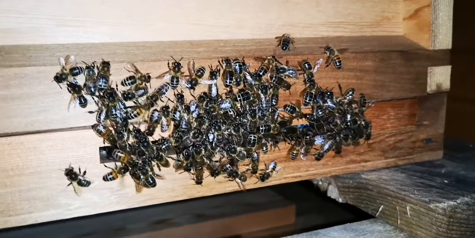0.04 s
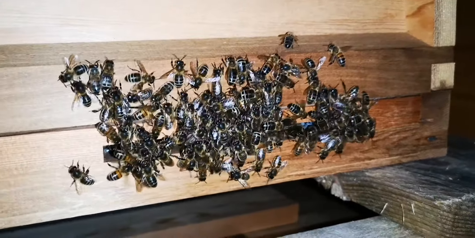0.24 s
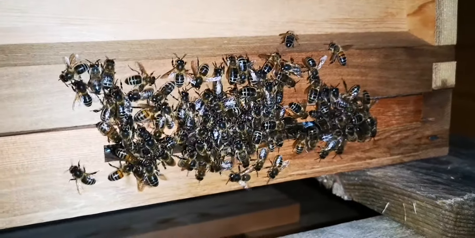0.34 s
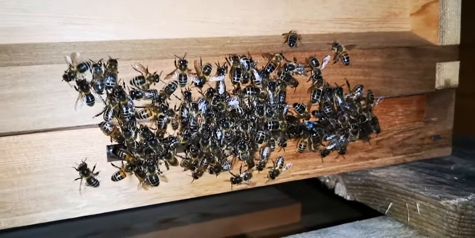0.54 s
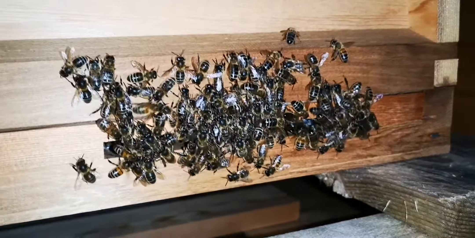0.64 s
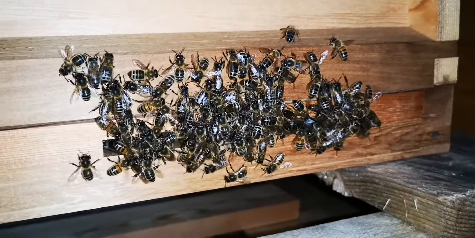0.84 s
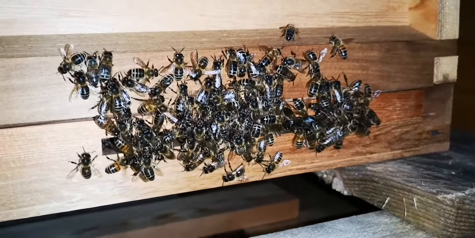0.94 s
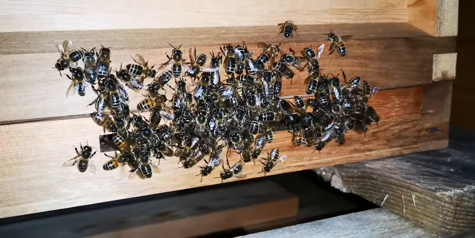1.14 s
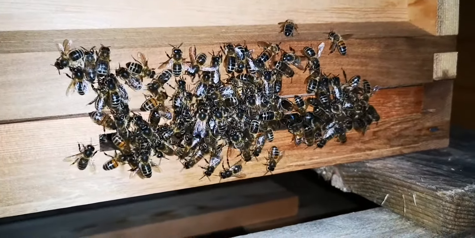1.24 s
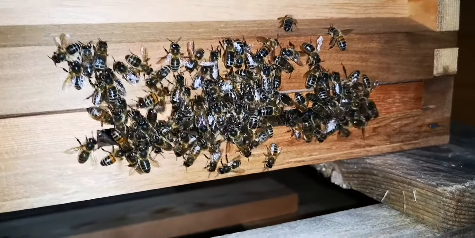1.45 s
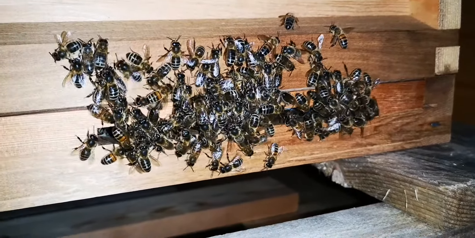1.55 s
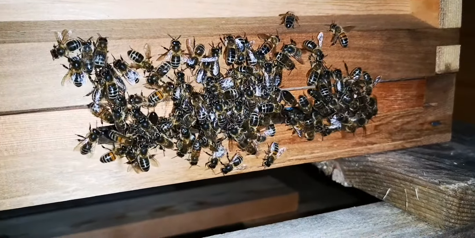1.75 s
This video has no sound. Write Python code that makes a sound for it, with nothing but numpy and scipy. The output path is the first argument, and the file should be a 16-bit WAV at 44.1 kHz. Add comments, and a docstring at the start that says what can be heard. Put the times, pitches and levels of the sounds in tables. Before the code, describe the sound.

A cluster of honey bees hums faintly throughout, slightly to the right, over a soft crawling rustle, steady hiss and low handling rumble. At about 0.25 seconds the hand-held microphone gives a dull thump and a brief rub. Single bees buzz harder around 0.35, 0.6, 1.35 and 1.6 seconds, with tiny scuffs and a barely audible thin whine near 0.5. A small, low knock comes at 1.6 seconds.

```python
"""At the wall of a wooden hive at night, a cluster of honey bees hums faintly, a little right of a
hand-held camera. Many wings beat at nearly the same pitch; single bees fan harder or scuff, and a thin
whine comes and goes over the soft rustle of crawling bodies and steady microphone hiss.
The hand rumbles and bumps on the camera, shifts its grip once with a dull thump and a rub,
and later gives a small knock."""
import sys
import numpy as np
from scipy.fft import rfft, irfft, next_fast_len
from scipy.io import wavfile
from scipy.ndimage import map_coordinates

SR = 44100
rng = np.random.default_rng(int(sys.argv[2]) if len(sys.argv) > 2 else 0)


def unload_audio(sound):
    """Save the sound as a 16-bit wav file, at the path given as the first command line argument."""
    columns = np.transpose(np.atleast_2d(sound))
    # keep every value between -1 and 1, then stretch to whole-number steps
    steps = np.round(np.clip(columns, -1, 1) * 32767)
    wavfile.write(sys.argv[1], SR, steps.astype(np.int16))


N = 79380
TIME = np.arange(N) / SR


def amp(db):
    """Decibels to gain."""
    return 10 ** (np.asarray(db) / 20)


def unit(x):
    """Scale to rms 1."""
    return x / np.sqrt(np.mean(x ** 2) + 1e-20)


def along(points, hz):
    """Read (frequency [Hz], value) points on a log axis."""
    freqs, values = np.transpose(points)
    return np.interp(np.log(hz + 1), np.log(freqs + 1), values)


def fader(points):
    """Ride through (time [s], value) points, one value per sample."""
    return np.interp(TIME, *np.transpose(points))


def wobble(per_s):
    """Smooth random modulation, per_s knots a second."""
    return map_coordinates(rng.standard_normal(1024), [TIME * per_s + 2], mode="wrap")


def swell(middle_s, half_s):
    """A bell-shaped fade in and out."""
    return np.exp(-((TIME - middle_s) / half_s) ** 2)


def filtered(x, response):
    """Filter x by a complex response of frequency."""
    size = next_fast_len(N + SR // 2)
    return irfft(rfft(x, size) * response(np.fft.rfftfreq(size, 1 / SR)), size)[..., :N]


def noise(eq):
    """Noise coloured by an EQ curve, at rms 1."""
    size = next_fast_len(N + SR // 4)
    gain = amp(along(eq, np.fft.rfftfreq(size, 1 / SR)))
    return unit(irfft(rfft(rng.standard_normal(size)) * gain, size)[:N])


# Timbre of a wingbeat (frequency [Hz], relative level [dB])
WING_TIMBRE = [(130, -3), (175, -5.5), (255, -8), (320, -12), (390, -19), (480, -18), (620, -17.5),
               (950, -27.5), (1600, -31.5), (2400, -30)]
def wings(hz, dark_db_per_octave=0, wander=.02, jitter=.06):
    """Beating wings buzz in 15 harmonics; the pitch drifts and jitters, the level flutters."""
    pitch = hz * (1 + wander * wobble(per_s=7) + jitter * wobble(per_s=80))
    phase = 2 * np.pi * np.cumsum(pitch) / SR
    buzz = 0
    for k in range(1, 16):
        db = along(WING_TIMBRE, k * hz) - dark_db_per_octave * np.log2(k)
        buzz += amp(db) * np.sin(k * phase + 2 * np.pi * rng.random())
    flutter_db = 2 * wobble(per_s=77)
    return unit(buzz * amp(flutter_db))


# Groups of humming bees (wingbeat [Hz], relative level [dB])
BEE_GROUPS = [(122, -4.5), (131, -4), (141, -6.5), (160, -5.5)]
# Fader ride of the hum (time [s], level [dB])
HUM_RIDE = [(0, -69.5), (.33, -67.5), (.5, -70.5), (.62, -69), (.75, -71), (.9, -66), (1.15, -70),
            (1.42, -65), (1.5, -68.5), (1.66, -65.5), (1.8, -69.5)]
def hum(swell_db=2):
    """The bed of many beating wings: each group swells and fades by itself."""
    chorus = 0
    for hz, db in BEE_GROUPS:
        group = wings(hz) * amp(swell_db * wobble(per_s=8.99))
        chorus += amp(db) * unit(group)
    return amp(fader(HUM_RIDE)) * unit(chorus)


# Colour of the rustle (frequency [Hz], relative level [dB])
RUSTLE_EQ = [(60, -47), (200, 6), (300, 10), (450, 8.5), (750, -1.5), (980, 3), (1220, -7.5), (1520, -1.5),
             (2100, -8), (4000, -14), (7500, -16.5), (10000, -70)]
def rustle():
    """Crawling bodies blend into a soft, steady noise."""
    return amp(-74) * noise(RUSTLE_EQ)


# Colour of the hand's rumble (frequency [Hz], relative level [dB])
RUMBLE_EQ = [(5, -1), (12, -2.5), (25, -1.5), (42, -10.5), (75, -11.5), (110, -20), (200, -32), (500, -66)]
# Fader ride of the rumble (time [s], level [dB])
RUMBLE_RIDE = [(0, -50.5), (.1, -57.5), (.17, -51), (.22, -55.5), (.33, -49), (.38, -63), (.55, -55),
               (.8, -57.5), (1.2, -59.5), (1.42, -58.5), (1.55, -57.5), (1.65, -56.5), (1.8, -59.5)]
def hand_rumble(width_db=-14):
    """The hand rumbles through the camera body, nearly alike in both microphones."""
    width = amp(width_db) * np.array([noise(RUMBLE_EQ), noise(RUMBLE_EQ)])
    return amp(fader(RUMBLE_RIDE)) * (noise(RUMBLE_EQ) + width)


# Colour of each microphone's hiss (frequency [Hz], relative level [dB])
HISS_LEFT_EQ = [(50, 9), (500, -6), (1200, 0.5), (1800, 5), (2600, 3), (3300, -2), (4200, -3.5), (5000, -4),
                (7900, -9), (8400, -9), (10500, -12.5), (15500, -10.5)]
HISS_RIGHT_EQ = [(50, 14), (500, 3), (1250, 1), (1800, 7.5), (2900, 1), (3900, -1.5), (4700, -5.5),
                 (5200, 0.5), (6400, -1.5), (7100, 2), (7900, 2), (8300, -6), (10200, -10.5),
                 (15500, -14.5)]
# Slow drift of the hiss (time [s], boost [dB])
HISS_RIDE = [(0, 1), (.2, 2), (.45, 2.5), (.72, 1.7), (.9, 1.2), (1.4, 1), (1.63, 1.8), (1.8, 1)]
def microphone_hiss(waver_db=.52):
    """Each microphone has its own slightly wavering hiss, louder on the right."""
    gain = amp(fader(HISS_RIDE) + waver_db * wobble(per_s=16))
    left = amp(-76.5) * noise(HISS_LEFT_EQ)
    right = amp(-72) * noise(HISS_RIGHT_EQ)
    return gain * np.array([left, right])


def push(deepest_s, hz):
    """One soft swing of the camera body: a dip between two shallow crests."""
    spread = (np.pi * hz * (TIME - deepest_s)) ** 2
    return (2 * spread - 1) * np.exp(-spread)


# Bumps on the camera (time [s], peak level [dB], swing [Hz])
CAMERA_BUMPS = [(0.103, -42, 20.4), (0.278, -29, 20.3), (0.363, -48.5, 37), (0.459, -44, 13),
                (0.898, -56, 66), (1.01, -47.5, 14.7), (1.279, -48.5, 21.3), (1.388, -47.5, 17.6),
                (1.478, -48, 26), (1.629, -45, 97)]
def bumps():
    """The hand nudges the camera; the last, quickest push is a small knock."""
    return sum(amp(db) * push(at_s, hz) for at_s, db, hz in CAMERA_BUMPS)


# Accents in the hum (middle [s], half length [s], wingbeat [Hz], level [dB])
FANNING_SURGES = [(0.13, 0.069, 141, -68), (0.353, 0.023, 138, -61.5), (0.599, 0.039, 139, -61.5),
                  (0.648, 0.029, 131.3, -58), (0.828, 0.02, 130, -65.5), (1.079, .04, 136, -67.5),
                  (1.217, 0.046, 143, -65), (1.355, 0.017, 130, -60.5), (1.621, 0.064, 120, -60.5)]
def fanning():
    """Single bees fan harder for a moment, darker in tone than the hum."""
    return sum(amp(db) * swell(middle_s, half_s) * wings(hz, dark_db_per_octave=9.5)
               for middle_s, half_s, hz, db in FANNING_SURGES)


def grip_thump(start_s=.213, attack_s=.01036):
    """The grip slips abruptly and gives the camera one deep, dull swing."""
    slip = np.clip((TIME - start_s) / attack_s, 0, 1)
    fade_in = np.sin(np.pi / 2 * slip) ** 2
    return amp(-21) * fade_in * push(deepest_s=.271, hz=8.77)


def friction(eq, grain_db):
    """Skin sticks and slips: grainy noise, separate in each microphone."""
    return np.array([unit(noise(eq) * amp(grain_db * wobble(per_s=400))) for mic in range(2)])


# Colour of the rub (frequency [Hz], relative level [dB])
RUB_EQ = [(60, 8), (150, 26.5), (290, 23.5), (550, 5.5), (1500, 1), (2800, 2), (4500, -4), (8000, -1),
          (11000, -13), (15500, -12)]
def finger_rub(start_s=.232, length_s=.12, attack_s=.0079, release_s=.045):
    """A finger slides briefly on the case as the grip shifts."""
    attack = np.clip((TIME - start_s) / attack_s, 0, 1)
    release = np.exp(-np.maximum(TIME - start_s - length_s, 0) / release_s)
    return amp(-65.5) * attack * release * friction(RUB_EQ, grain_db=2)


# Colour of the scratch (frequency [Hz], relative level [dB])
SCRATCH_EQ = [(2000, -29), (7000, 9), (12000, -3), (15500, -8)]
def skin_scratch(start_s=.258, decay_s=.0073):
    """The sliding skin catches once with a short, bright scratch."""
    envelope = (TIME > start_s) * np.exp(-np.abs(TIME - start_s) / decay_s)
    return amp(-70) * envelope * friction(SCRATCH_EQ, grain_db=2.5)


# Scuffs in the cluster (middle [s], half length [s], band centre [Hz], level [dB])
BEE_SCUFFS = [(0.348, 0.017, 2500, -75), (0.361, 0.025, 1000, -79), (0.738, 0.014, 1840, -75),
              (1.52, 0.012, 6050, -82), (1.623, .016, 6100, -85.5)]
def scuffs(width_octaves=.2):
    """Legs and wings scrape briefly, each scrape in its own narrow band."""
    scrapes = 0
    for middle_s, half_s, centre_hz, db in BEE_SCUFFS:
        band = lambda hz: np.exp(-(np.log2((hz + 1) / centre_hz) / width_octaves) ** 2 / 2)
        scrape = unit(filtered(rng.standard_normal(N), band))
        scrapes += amp(db) * swell(middle_s, half_s) * scrape
    return scrapes


def whine(hz=1593, wander=.00775):
    """One thin, wavering tone comes and goes in the cluster."""
    pitch = hz * (1 + wander * wobble(per_s=40))
    tone = unit(np.sin(2 * np.pi * np.cumsum(pitch) / SR))
    return amp(-85.5) * swell(middle_s=.51, half_s=.14) * tone


# Stereo balance of the bees (frequency [Hz], left minus right [dB])
BEE_PAN = [(130, 1.5), (260, -2.5), (400, -3), (900, -6), (1600, -11.5), (2400, 6), (6000, -10)]
# Lag of the left microphone behind the right (frequency [Hz], delay [s])
LEFT_LAG = [(130, 0.00097), (260, 0.00088), (600, 0.00084), (1000, 0.00072), (1500, 0.00069), (3500, .0006)]
def pan_right(bees):
    """The bees reach the right microphone first, and louder in most bands."""
    side = np.array([[.5], [-.5]])  # left and right each take half the difference
    balance = lambda hz: amp(side * along(BEE_PAN, hz))
    delay = lambda hz: np.exp(-2j * np.pi * hz * side * along(LEFT_LAG, hz))
    return filtered(bees, lambda hz: balance(hz) * delay(hz))


def scene():
    """The mix: bees to the right, handling noise in the centre, hiss underneath."""
    bees = hum() + fanning() + rustle() + scuffs() + whine()
    handling = hand_rumble() + bumps() + grip_thump() + finger_rub() + skin_scratch()
    return pan_right(bees) + handling + microphone_hiss()


def record(dry):
    """The camera keeps nothing above its band limit."""
    top_hz = 15720
    return filtered(dry, lambda hz: hz < top_hz)


dry = scene()
out = record(dry)
unload_audio(out)
```